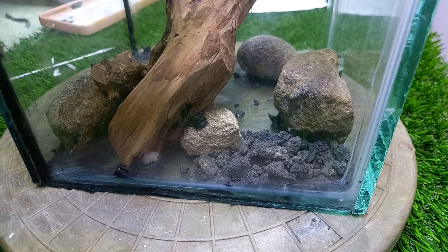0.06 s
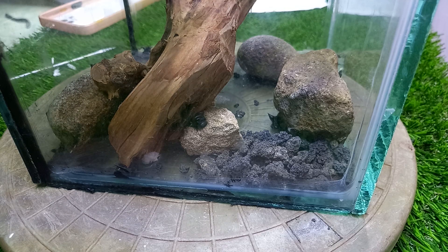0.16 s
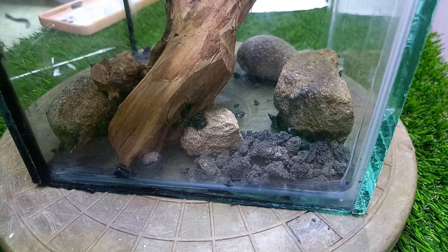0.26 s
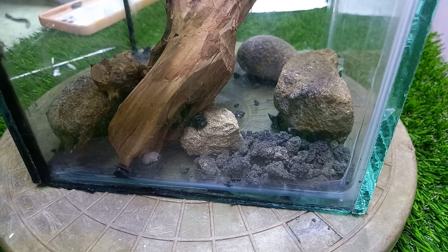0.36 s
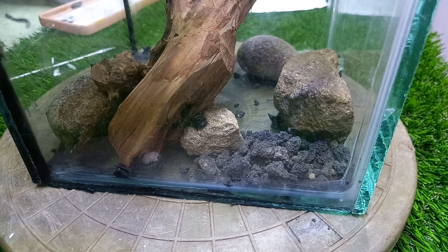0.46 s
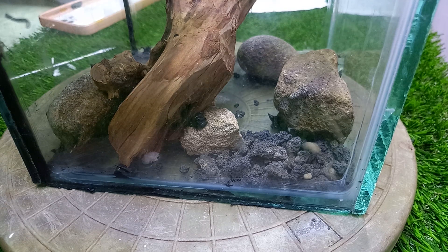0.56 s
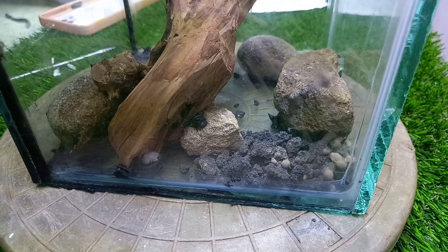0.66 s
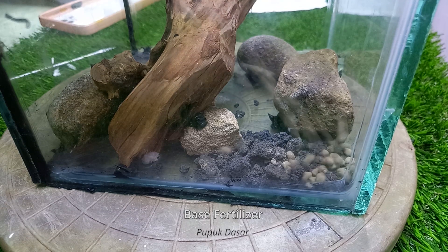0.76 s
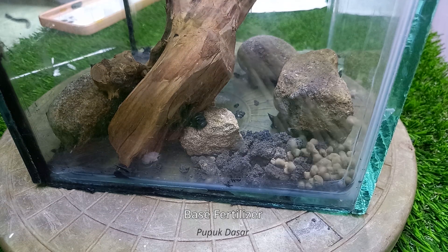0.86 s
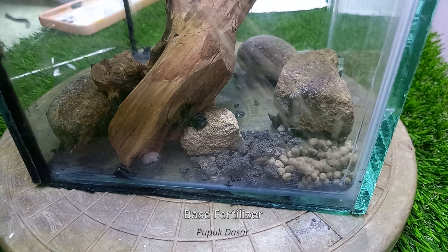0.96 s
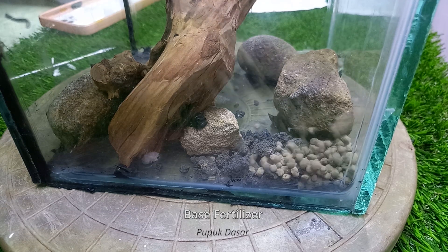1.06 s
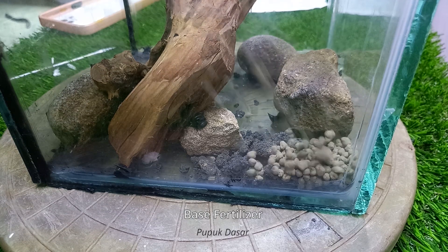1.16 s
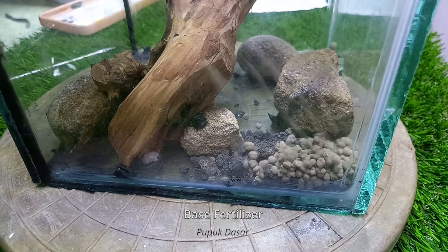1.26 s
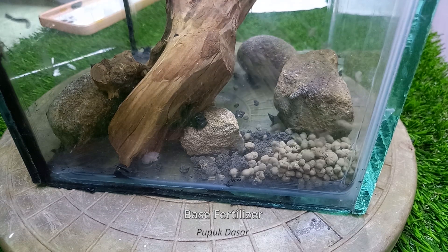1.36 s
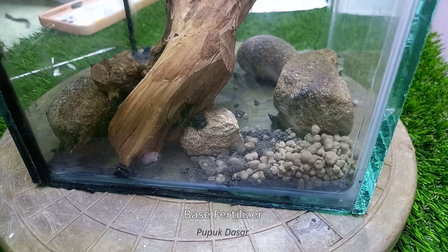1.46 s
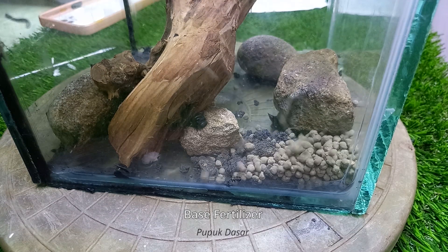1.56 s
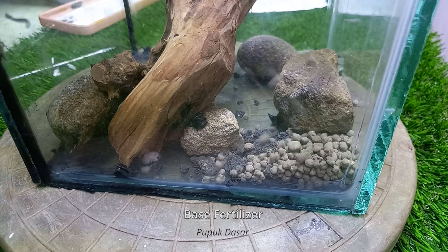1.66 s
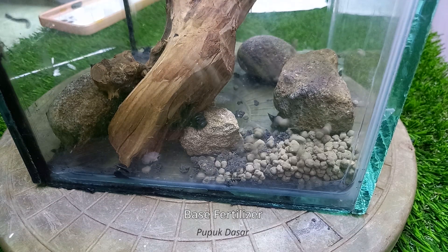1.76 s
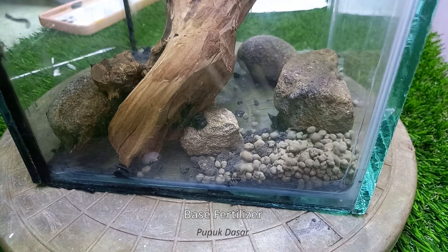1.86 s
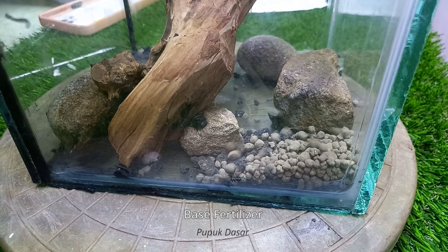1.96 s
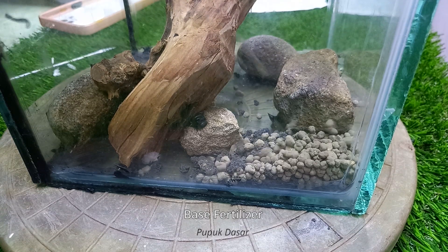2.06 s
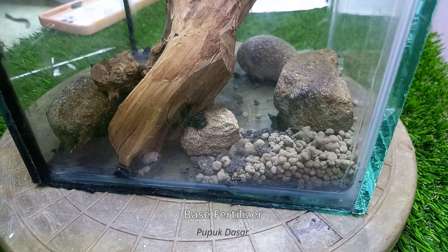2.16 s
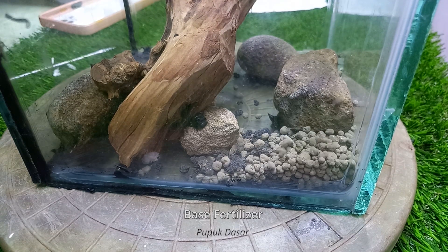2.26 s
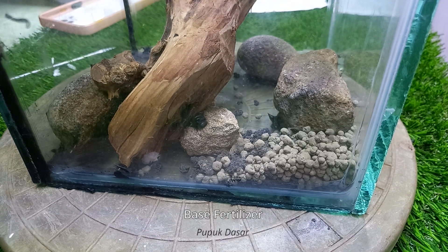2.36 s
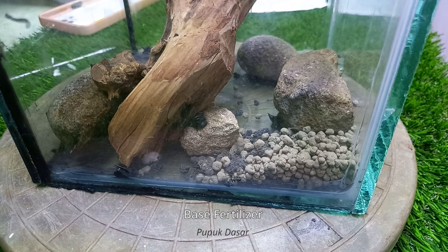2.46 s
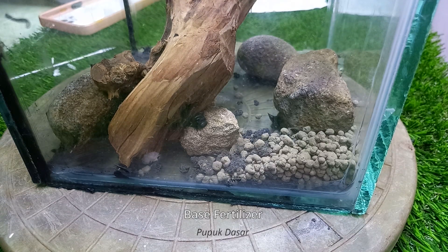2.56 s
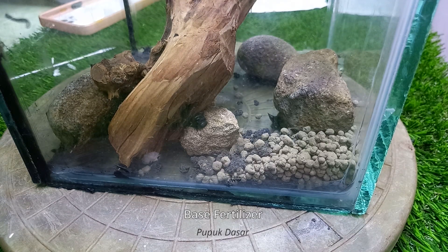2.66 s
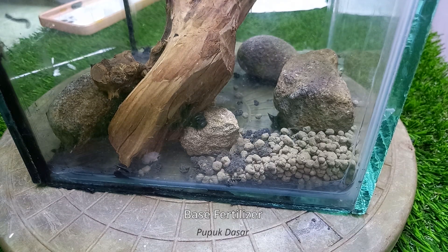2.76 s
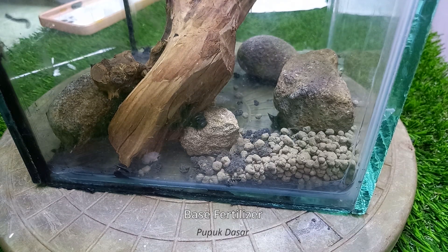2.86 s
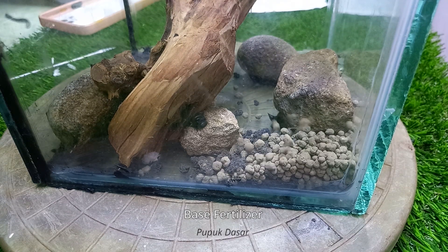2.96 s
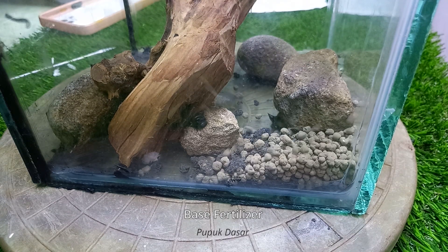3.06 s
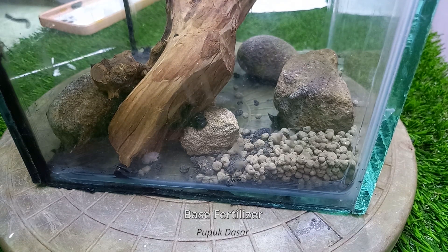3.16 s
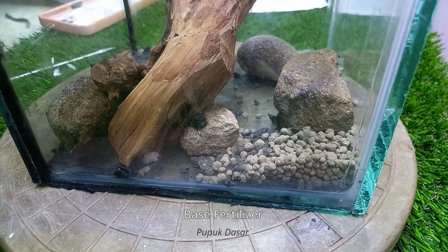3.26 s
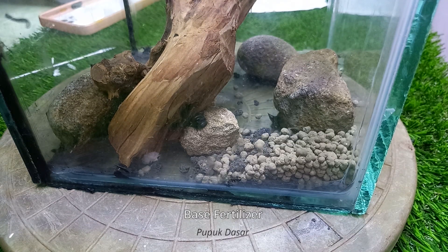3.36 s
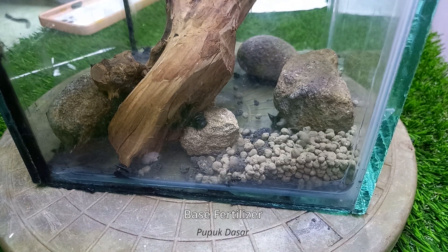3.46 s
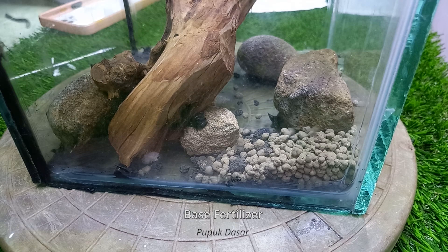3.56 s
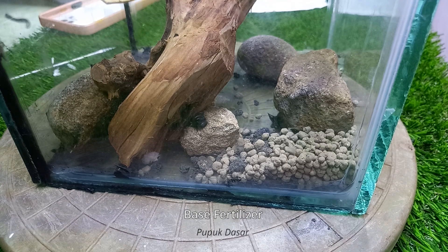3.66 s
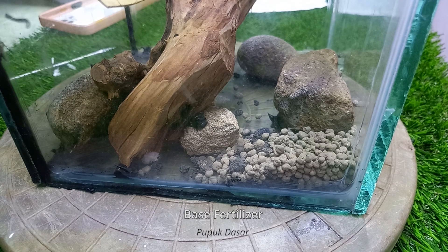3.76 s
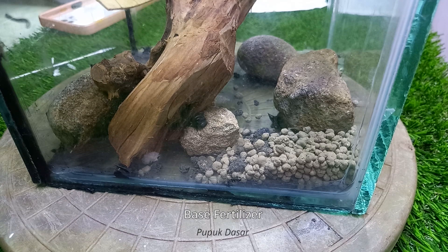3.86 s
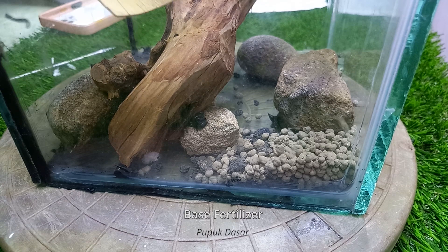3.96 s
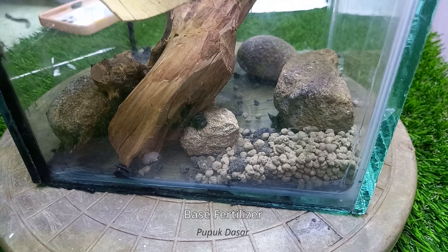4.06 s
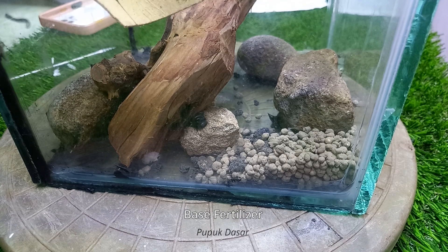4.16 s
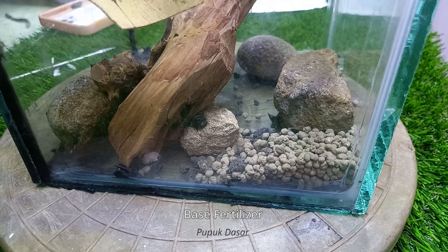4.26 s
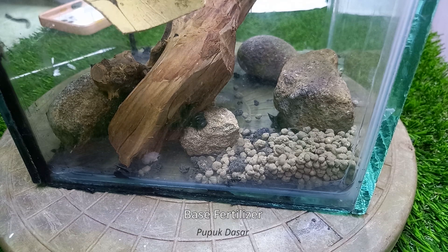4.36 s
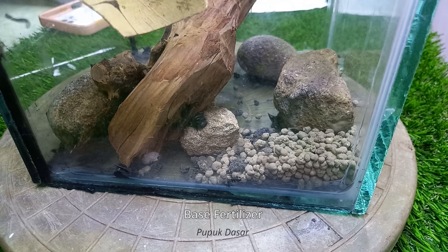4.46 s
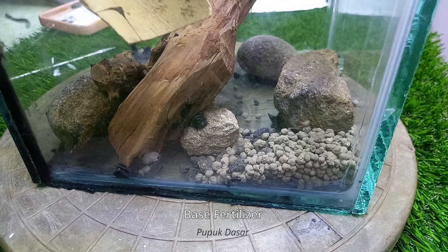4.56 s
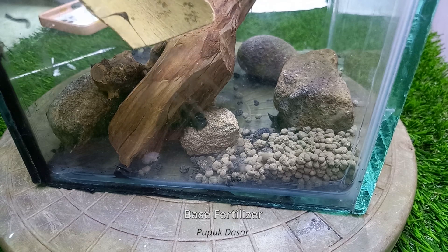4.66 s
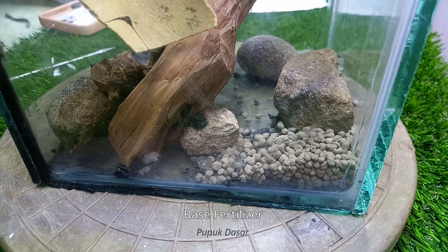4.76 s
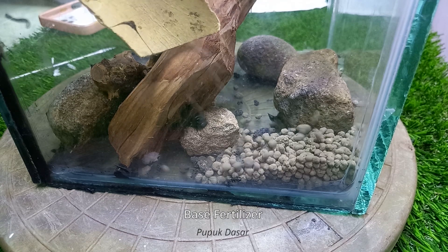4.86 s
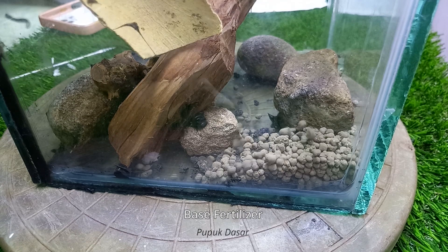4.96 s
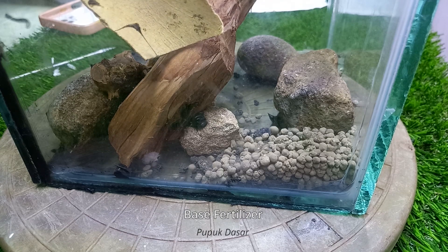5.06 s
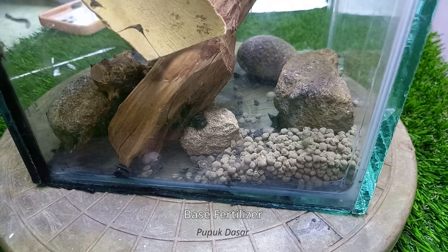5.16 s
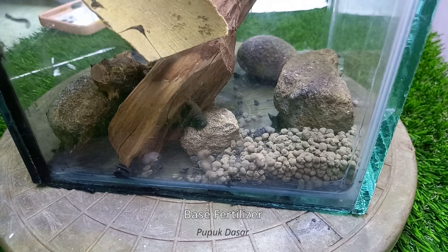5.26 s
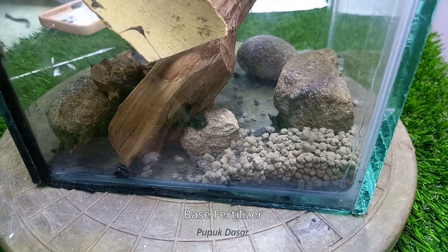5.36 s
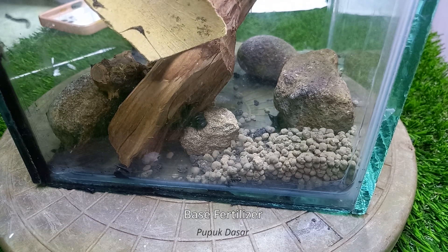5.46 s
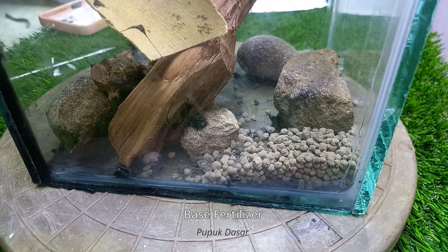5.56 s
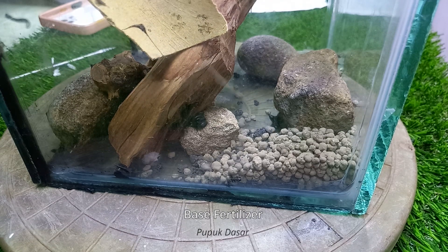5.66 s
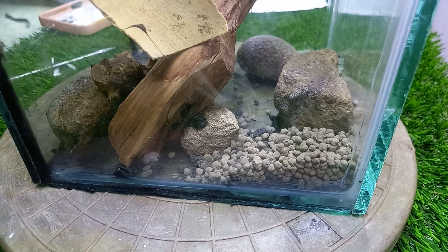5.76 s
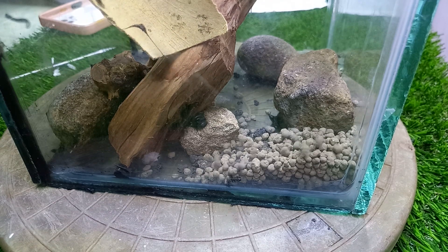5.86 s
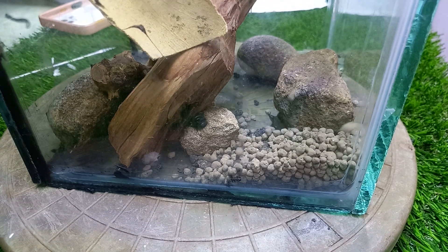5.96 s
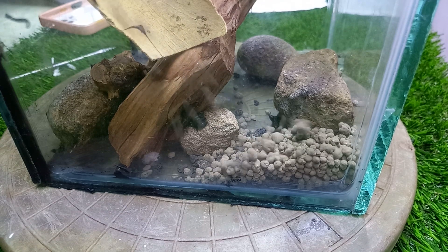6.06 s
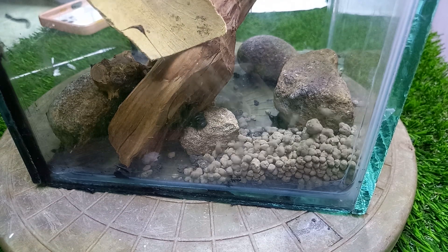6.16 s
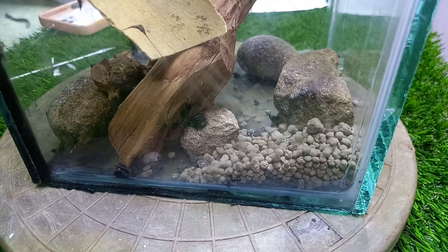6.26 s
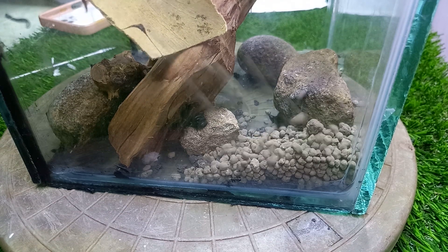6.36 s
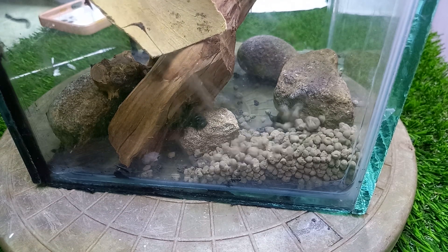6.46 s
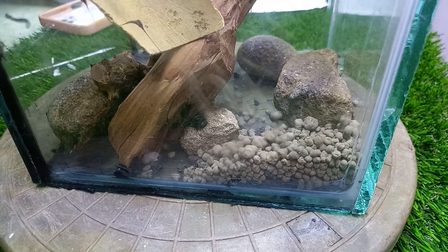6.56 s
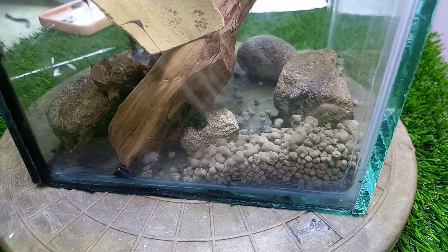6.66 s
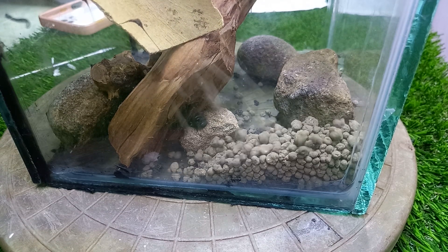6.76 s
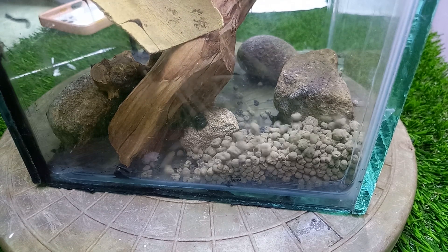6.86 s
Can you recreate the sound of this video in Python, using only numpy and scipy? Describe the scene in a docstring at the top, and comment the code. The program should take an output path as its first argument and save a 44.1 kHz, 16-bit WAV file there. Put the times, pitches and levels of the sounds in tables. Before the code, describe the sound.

Dry clay pellets are poured in three goes into an empty glass tank, clicking and rattling, while a distant engine drones and slows outside.

```python
"""In a small room, clay-like fertiliser pellets are poured into an empty glass aquarium in three goes, close by.
Each pellet is a short click with reflections; heap, bottom, panes and tank colour it or ring as dying sines.
Single hard hits, wall taps, low thuds and dull clatters stand out from the stream.
Outside, a distant engine, a sum of sines, drones and slowly loses speed.
Shaped noise gives the traffic, a deep rumble and still air."""
import sys
import numpy as np
from scipy import signal
from scipy.fft import rfft, irfft
from scipy.io import wavfile
from scipy.ndimage import uniform_filter1d

SR = 44100
rng = np.random.default_rng(int(sys.argv[2]) if len(sys.argv) > 2 else 0)


def generate_wav(sig):
    """Save sig (samples, or channels by samples) to the path in sys.argv[1] as 16-bit PCM at SR."""
    pcm = np.round(np.clip(np.atleast_2d(sig).T, -1, 1) * 32767).astype(np.int16)
    wavfile.write(sys.argv[1], SR, pcm)


N = 304290  # length in samples
TIME = np.arange(N) / SR  # seconds

# Levels in the tables are starting values: trims in the functions are added to them.
# traffic rumble, its colour: pitch_hz, level_db per Hz
TRAFFIC_COLOUR = [(20, -46), (40, -25), (70, -8), (100, 0), (140, 5.5), (180, -5.5), (270, -9),
                  (380, -16.5), (550, -32.5), (1200, -63)]
# traffic rumble, its loudness: time_s, level_db
TRAFFIC_LEVEL = [(0, -57.5), (.3, -50.5), (.55, -51.5), (1.05, -50), (1.25, -52.5), (2.1, -49.5),
                 (2.35, -57.5), (2.62, -44.5), (3.15, -45), (3.33, -51), (3.64, -46.5), (3.85, -50.5),
                 (4.6, -53.5), (4.9, -55), (5.3, -52.5), (6.2, -55.5), (6.9, -59)]
# deep rumble of the building: pitch_hz, level_db per Hz
DEEP_COLOUR = [(20, -48), (38, -27), (51, -8), (62, -9), (100, -21), (300, -70.5)]
# hiss of still air: pitch_hz, level_db per Hz
AIR_COLOUR = [(100, 2), (500, 2), (1000, -6), (3000, -10.5), (8000, -9.5), (16000, -22)]
# surges, several a second, of the sliding pellets and of the rumble: rate_hz, level_db
SURGES = [(1.5, -30), (4, 0), (12, 0), (40, -40), (100, -90)]
# average speed of the engine: time_s, turns_per_s
ENGINE_SPEED = [(0, 30.3), (1, 30.5), (1.7, 30.2), (2.2, 29.5), (2.5, 30.2), (3, 29.9), (3.4, 29),
                (3.75, 28.1), (4.05, 27.5), (4.4, 26.5), (4.8, 25.8), (5.3, 25.3), (5.85, 24), (6.3, 22.6),
                (6.9, 22.2)]
# loudness of the engine's drone: time_s, level_db
DRONE_LEVEL = [(0, -57), (.15, -58), (.3, -41), (.53, -48.5), (.77, -36), (1.2, -42.5), (1.72, -40),
               (2.35, -46), (2.77, -32), (3.15, -39), (3.6, -35.5), (4.4, -37.5), (4.95, -52.5),
               (5.27, -43), (5.6, -46), (6.28, -47), (6.4, -63.5), (6.9, -63)]
# loudness of the engine's third order: time_s, level_db
THIRD_ORDER_LEVEL = [(0, -68), (.35, -48.5), (1.9, -48.5), (2.25, -39.5), (2.7, -41), (3.15, -48),
                     (3.42, -44), (3.8, -60), (4.05, -45), (4.3, -65), (4.55, -53.5), (6.3, -53),
                     (6.5, -76), (6.9, -78)]
# loudness of the engine's second order: time_s, level_db
SECOND_ORDER_LEVEL = [(0, -70), (2.8, -68), (3.1, -55), (3.55, -63), (3.9, -59), (4.6, -52), (5, -66),
                      (5.4, -58), (6, -70)]
# brief dips of the drone and the third order: centre_s, change_db
DRONE_DIPS = [(1.0, -0.5), (1.21, -6), (1.46, -3), (1.87, -6), (2.33, -3.5), (3.29, -23), (3.5, -6),
              (3.75, -8.5), (3.95, -7.5), (4.21, -12), (4.93, -6), (6.05, -16)]
# how the room favours some of the engine's orders: pitch_hz, level_db
ROOM_BOOM = [(88, -41), (102, 1), (120, 1.5), (130, -16), (148, -32.5), (180, -39), (215, -24.5),
             (310, -28), (420, -22.5)]
# dull clatters further off in the room: start_s, level_db, die_away_s (time to fall 60 dB)
CLATTER_EVENTS = [(0.096, -56.5, 0.36), (3.396, -44, 0.21), (3.609, -47.5, 0.18), (3.879, -69, 0.44)]
# colour of those clatters: pitch_hz, level_db per Hz
CLATTER_COLOUR = [(180, -32), (330, 7), (500, -9.5), (800, -3), (1400, -11), (2200, -12), (4000, -40)]
# lumps that thud on the bottom: start_s, strength_db, pitch_hz, knock_db (added to the strength)
THUD_EVENTS = [(0.663, -36, 408, 8), (0.935, -31, 370, -1), (1.043, -31, 375, -2), (1.257, -32, 353, -9),
               (1.659, -30, 314, -5), (3.293, -37, 344, -6), (4.886, -35, 345, -18),
               (4.962, -34.5, 349, -7), (5.272, -37, 338, 2), (5.704, -21, 364, -13),
               (5.903, -28.5, 368, 9), (6.364, -30, 352, -5), (6.528, -24.5, 362, -2),
               (6.568, -36, 358, -8), (6.617, -25, 370, -9), (6.882, -32, 377, -2)]
# pellets that glance off a side wall and let it ring: start_s, strength_db
TAP_EVENTS = [(2.145, -20), (2.174, -26), (2.246, -27.5), (2.352, -42), (3.951, -30), (3.9932, -26),
              (4.0238, -37), (5.3537, -17)]
# single pellets that land hard: start_s, level_db (first 5 ms), pitch_hz, hardness_db (treble against the rest)
HARD_PELLETS = [(0.0953, -42, 4570, -6), (0.2007, -32, 2170, -3), (0.2153, -39, 3980, -4),
                (0.2415, -41, 2280, -15), (0.2513, -37, 3980, -5), (0.2765, -33, 6440, -1),
                (0.2884, -30.5, 4340, -8), (0.3057, -34, 4500, -1), (0.3258, -29.5, 2200, -13),
                (0.364, -29.5, 4530, -7), (0.4103, -36, 2590, -14), (0.492, -30.5, 3500, -18),
                (0.585, -31, 3500, -17), (0.662, -28, 1970, -6), (0.724, -31.5, 4500, 5),
                (0.756, -35, 7200, 6), (0.786, -32, 7100, 11), (0.811, -42, 3600, -13),
                (0.928, -30, 7200, 4), (1.05, -29.5, 2710, -10), (1.076, -31, 3800, 0),
                (1.175, -35.5, 7200, 5), (1.246, -32, 4940, -6), (1.379, -31.5, 1400, -12),
                (1.4761, -27.5, 2800, -11), (1.6073, -33, 4340, -22), (1.6585, -30.5, 5150, -3),
                (1.761, -30.5, 3550, -5), (1.7917, -33.5, 5860, 2), (1.8176, -34, 2600, -8),
                (1.843, -32.5, 4530, 2), (1.9008, -34, 4530, -18), (1.947, -35, 3660, -17),
                (1.9572, -34, 3820, -11), (1.9766, -39, 2590, -5), (1.9906, -37, 4530, 5),
                (2.0042, -33.5, 4000, -14), (2.021, -39, 3660, 2), (2.049, -32.5, 7580, 18),
                (2.0854, -33.5, 2780, -4), (2.1251, -34.5, 2620, -3), (2.178, -39, 6120, 7),
                (2.2388, -44, 8260, 7), (2.2479, -41, 4530, -2), (2.2605, -42.5, 2840, -2),
                (2.5302, -49.5, 4970, -7), (2.5764, -39, 5300, -15), (2.5933, -47, 4940, -9),
                (2.6246, -43.0, 6390, -1), (2.639, -45, 5380, -3), (2.6484, -39, 5380, 1),
                (2.6703, -42, 4530, 2), (2.693, -45, 2850, -4), (2.7121, -41.5, 4530, 0),
                (2.725, -43, 7260, 2), (2.741, -42, 4340, -6), (2.76, -42, 4340, -10),
                (2.771, -38, 2190, -15), (2.7937, -39.5, 6390, 8), (2.8098, -44, 4500, -2),
                (2.8263, -38.5, 3210, -11), (2.8809, -36.5, 6960, 10), (2.9308, -33.5, 7260, 4),
                (2.948, -34, 4300, -3), (2.957, -39, 1950, 3), (2.965, -41, 1900, -4), (2.98, -48, 3600, 3),
                (3.007, -35.5, 4340, -3), (3.0324, -36, 2830, -9), (3.044, -36.5, 2490, -3),
                (3.0772, -35.5, 2590, 2), (3.0964, -38.5, 1920, -7), (3.104, -39, 2950, -9),
                (3.1554, -36.5, 2370, -34), (3.1855, -39.5, 5610, 1), (3.232, -39.5, 2270, -17),
                (3.24, -45, 4160, 3), (3.2621, -34.5, 7580, 5), (3.2897, -42.0, 2710, -26),
                (3.3077, -41, 2710, -16), (3.3158, -38.5, 4730, 7), (3.3551, -33, 5430, -1),
                (3.3787, -37.5, 4730, -1), (3.395, -38, 2450, -19), (3.4293, -41.5, 6670, 0),
                (3.48, -43.5, 7910, 2), (3.4995, -51.5, 2300, -15), (3.5556, -52.5, 4940, -3),
                (3.599, -42.5, 7260, 5), (3.6485, -51.5, 5110, -9), (3.664, -50.5, 1840, -19),
                (3.701, -45, 5860, -8), (3.7154, -39.5, 6160, -6), (3.754, -42.5, 3660, -15),
                (3.7627, -42, 4530, -1), (3.78, -43.5, 3630, -7), (3.82, -42, 5610, -10),
                (3.854, -36, 2870, -14), (3.8645, -38, 2510, -20), (3.8865, -44, 2380, -28),
                (3.9342, -48, 7580, 5), (3.941, -46, 7260, -2), (3.952, -48, 5150, -10),
                (3.9674, -49, 3980, -17), (4.026, -45.5, 4530, 5), (4.044, -47, 4580, -16),
                (4.0784, -52, 5100, 5), (4.096, -48, 4940, -8), (4.1192, -40, 4560, -3),
                (4.147, -51, 3210, -11), (4.1646, -48.5, 1720, -8), (4.2192, -47.5, 4160, -10),
                (4.2412, -47, 1840, -5), (4.2846, -40.5, 1750, -10), (4.301, -37.5, 1880, -2),
                (4.3267, -47, 1900, 0), (4.351, -43.5, 1950, 3), (4.377, -41, 4530, 5),
                (4.4838, -42, 4340, -5), (4.5445, -43, 3400, -13), (4.555, -44, 3900, -6),
                (4.5724, -34.5, 4500, 2), (4.678, -36, 4300, 8), (4.7837, -36, 2710, -8),
                (4.802, -30, 1580, -23), (4.8532, -32.5, 5380, 0), (4.8704, -36, 5190, -12),
                (4.9354, -34, 7260, 7), (5.0264, -41, 1200, -23), (5.062, -36.5, 1680, -9),
                (5.0801, -37, 4940, 0), (5.1117, -43, 1620, -10), (5.1321, -34, 1340, -15),
                (5.148, -39, 1390, -3), (5.219, -39.5, 1610, -13), (5.272, -39, 1490, -19),
                (5.2816, -40, 3800, -6), (5.311, -34.0, 5500, -7), (5.4004, -41.5, 4940, -3),
                (5.42, -46, 4950, -15), (5.429, -40.5, 7580, -9), (5.4367, -41, 1740, -16),
                (5.482, -41.5, 7580, 3), (5.493, -38, 5380, -4), (5.524, -42, 7240, 1),
                (5.535, -45, 1760, -3), (5.5598, -40, 4940, -16), (5.6234, -34.5, 1690, -4),
                (5.6442, -35.5, 2710, -29), (5.6663, -40, 4530, -19), (5.7139, -33.5, 1250, -29),
                (5.7507, -34.5, 2950, -4), (5.8698, -36, 1818, -13), (5.9385, -31.5, 1350, -4),
                (6.111, -30.5, 1590, -8), (6.2926, -30.5, 9000, 10), (6.422, -29, 1820, -11),
                (6.5254, -27.5, 1150, -6), (6.554, -30.5, 6030, 11), (6.701, -33.5, 1620, 4),
                (6.809, -33.5, 4530, -2), (6.8189, -37, 1190, -16)]
# colour of clicks: pitch_hz, level_db per Hz
CLICK_COLOUR = [(350, -28), (600, -22.5), (790, -18), (957, -10), (1160, -10), (1550, -14), (2150, -3.5),
                (3430, -7.5), (4520, -6.5), (6750, -10), (7310, -8.5), (9760, -10.5), (11700, -10.5),
                (14400, -15.5), (15100, -11), (15750, -14)]
# colour of knocks: pitch_hz, level_db per Hz
KNOCK_COLOUR = [(300, -38), (600, -3.5), (850, -5.5), (1200, -7), (1800, -1.5), (2400, -11), (3500, -2.5),
                (6000, -34)]
# modes (own ringing tones) of the glass walls: pitch_hz, width_hz, level_db
WALL_MODES = [(1406, 16, -5), (2770, 160, 5), (3760, 60, -2.5), (4640, 90, 2), (5350, 70, 2),
              (5870, 110, 3), (8150, 240, 4), (9010, 70, 3.5), (10230, 70, 3.5), (4400, 100, 3.5),
              (7112, 60, 9.5), (7375, 55, 5.5), (11420, 150, 5), (12100, 110, -1), (13660, 150, 0)]
# modes of the bottom pane: pitch_hz, width_hz, level_db
BOTTOM_MODES = [(766, 26, 8), (1161, 49, 12.5), (1415, 46, 10.5), (1690, 50, 8.5), (1816, 100, 7.5),
                (2150, 80, 0)]
# low modes of the whole tank: pitch_hz, width_hz, level_db
TANK_MODES = [(316, 26, 1.5), (367, 32, 4.5), (560, 240, -14.5), (792, 45, -8.5)]
# lean to one side by pitch: pitch_hz, left_minus_right_db
SIDE_LEAN = [(60, -12), (110, -16), (200, -21), (380, 18), (700, -4.5), (1290, -5), (2380, 3), (4400, 2),
             (8120, 6.5), (15000, 5.5)]
# strength of the stream, one list for each of the three goes: time_s, level_db
GOES = [
    [(.17, -57.5), (.27, -45), (.4, -33.5), (.72, -31.5), (1.17, -35), (1.5, -35.5), (1.98, -41.5),
     (2.15, -44.5), (2.22, -60.5), (2.36, -65)],
    [(2.58, -61), (2.74, -51), (2.85, -47.5), (2.97, -45), (3.12, -50), (3.36, -53), (3.52, -71),
     (3.65, -63), (3.85, -60), (4.03, -62.5), (4.22, -67)],
    [(4.31, -48), (4.45, -46.5), (4.72, -40), (4.95, -45), (5.17, -55), (5.3, -50), (5.54, -51),
     (5.68, -42.5), (6.1, -38.5), (6.47, -35.5), (6.9, -41)],
]
# where each go lands, against its clicks: bottom_knock_db, tank_boom_db, treble_db, spread_s (from heap to glass)
GO_LANDINGS = [(-10.5, -9.5, -3.5, 0.2), (-3.5, 2, 0, 0.35), (-2.5, -6.5, -0.5, 0.083)]
# reverberation of the room: pitch_hz, die_away_s (time to fall 60 dB)
ROOM_DECAY = [(300, 0.32), (1500, 0.33), (5000, 0.13), (14000, 0.14)]

# a stronger stream is thicker (dB of rate per dB) and cushions itself (dB of treble per dB)
USUAL_DB, USUAL_PER_S, STRAY_PER_S, THICKENING, CUSHIONING = -39, 700, 110, 1.35, -0.06
# the first pellets of a go fall softly on the heap
HEAP_KNOCK_DB, HEAP_BOOM_DB, HEAP_TREBLE_DB = -15, -47.5, -11.5


def gain_of(db):
    """Turns decibels into amplitude."""
    return 10 ** (np.asarray(db) / 20)


def evened(x):
    """Scales a sound to rms 1."""
    return x / np.sqrt(np.mean(x ** 2) + 1e-20)


def read(points, hz):
    """Reads a table between its points, on a log-frequency axis."""
    f, value = np.transpose(points)
    return np.interp(np.log(hz + 1), np.log(f + 1), value)


def curve(rows):
    """Draws straight lines between the points of a time table, one value per sample."""
    s, value = np.transpose(rows)
    return np.interp(TIME, s, value)


def add(mix, s, sound):
    """Mixes a stereo sound in at time s."""
    part = mix[:, max(round(s * SR), 0):][:, :sound.shape[1]]
    part += sound[:, :part.shape[1]]


def through(x, response):
    """Lets each channel excite a response (convolution), keeping the length."""
    x = np.atleast_2d(x)
    stereo = np.broadcast_to(x, (2, x.shape[1]))
    return signal.oaconvolve(stereo, response, axes=1)[:, :x.shape[1]]


def noise(points):
    """Noise of a given spectrum, rms 1."""
    spectrum = rfft(rng.standard_normal(N))
    shape = gain_of(read(points, np.fft.rfftfreq(N, 1 / SR)))
    return evened(irfft(spectrum * shape, N))


def treble_of(x, corner_hz=6400):
    """The part of a sound above a corner pitch."""
    high_pass = signal.butter(3, corner_hz, "high", fs=SR, output="sos")
    return signal.sosfiltfilt(high_pass, x, padtype="constant")


def brightened(x, treble_db):
    """Harder contact is shorter and so has more treble."""
    return x + (gain_of(treble_db) - 1) * treble_of(x)


def punch(click, size):
    """Scales a click so that the middle of its two channels has rms 1 over its first samples."""
    return click / np.sqrt(np.mean(click.mean(0)[:size] ** 2) + 1e-20)


def colour(points, size=4096):
    """A stereo response with a given spectrum that starts at once and leans to one side by pitch."""
    hz = abs(np.fft.fftfreq(size, 1 / SR))
    lean_db = np.array([[.5], [-.5]]) * read(SIDE_LEAN, hz)
    log_gain = np.log(gain_of(read(points, hz) + lean_db))
    minimum_phase = np.exp(np.conj(signal.hilbert(log_gain)))
    return np.fft.ifft(minimum_phase).real


def ringing(modes, size=2048):
    """One dying sine for each mode, wider ones dying sooner; each channel has its own phase."""
    t, sines = np.arange(size) / SR, []
    for hz, width, db in modes:
        decay = 2 * np.pi * width / SR * np.exp(-np.pi * width * t)
        phase = rng.uniform(-1.04, 1, (2, 1))
        sines.append(gain_of(db) * decay * np.cos(2 * np.pi * hz * t + phase))
    return np.array(sines)


def impact(hz, sharpness, scatter_db=-1, scatter_s=0.0036, direct_left=0.18, shared=0.4, size=1024):
    """One pellet: a snap of a few cycles, then its reflections between the glass walls."""
    f, t = np.fft.rfftfreq(size, 1 / SR) + 1, np.arange(size) / SR
    lag_s = max(rng.normal(0.0002, .00005), 0)  # the right microphone is nearer
    walls = rng.standard_normal((3, size)) * np.exp(-t / scatter_s)
    walls = rfft(walls * gain_of(scatter_db) / np.linalg.norm(walls[0]))
    # part of the reflections is alike in both ears
    walls = np.sqrt(shared) * walls[2] + np.sqrt(1 - shared) * walls[:2]
    left = (direct_left + 0.88 * walls[0]) * np.exp(-2j * np.pi * f * lag_s)
    right = 1 + 1.1 * walls[1]
    resonance = 1 + 1j * sharpness * (f / hz - hz / f)
    return irfft(np.array([left, right]) / resonance)


def struck(click, body, modes):
    """A click in the tank: where it lands, drawn at random, decides how much each mode rings."""
    strengths = np.sqrt(3) * rng.uniform(-0.77, 1, len(modes))
    ring = np.tensordot(strengths, modes, 1) * np.array([[1.25], [.75]])
    return signal.fftconvolve(click, body + ring, axes=1)


def background(deep_db=-60.5, deep_follows=0.42, air_db=-69, width=0.24):
    """Traffic and a deep rumble that swells with the engine, nearly alike in both ears, and hissing air."""
    drone_db = curve(DRONE_LEVEL)
    swell_db = drone_db - drone_db.mean()
    middle = noise(TRAFFIC_COLOUR) * np.array([[1.1], [.9]])
    sides = width * noise(TRAFFIC_COLOUR) * np.array([[1], [-1]])
    traffic = (middle + sides) * gain_of(2.2 * noise(SURGES))
    deep = gain_of(deep_db + deep_follows * swell_db) * noise(DEEP_COLOUR)
    air = gain_of(air_db) * np.array([noise(AIR_COLOUR), noise(AIR_COLOUR)])
    return gain_of(curve(TRAFFIC_LEVEL)) * traffic + deep + air


def engine(drone_db=-1.0, third_db=-2, dip_s=0.049, flutter=0.2, unsteady=0.011):
    """Low orders (multiples) of an uneven engine speed; the room's boom favours some of them."""
    speed = curve(ENGINE_SPEED)
    dips_db = sum(db * np.exp(-((TIME - s) / dip_s) ** 2) for s, db in DRONE_DIPS)
    waver = [(1, -12), (5, 0), (11, -1), (25, -22), (80, -90)]  # rate in Hz, dB
    angle = 2 * np.pi * np.cumsum(speed * (1 + unsteady * noise(waver))) / SR
    orders = np.zeros(N)
    for k in range(4, 13):
        orders += gain_of(read(ROOM_BOOM, k * speed)) * np.sin(k * angle + rng.uniform(0, 2 * np.pi))
    drone = gain_of(curve(DRONE_LEVEL) + dips_db + drone_db) * orders * (1 + flutter * noise(waver))
    third = gain_of(curve(THIRD_ORDER_LEVEL) + dips_db + third_db) * np.sin(3 * angle)
    third *= 1 + 2 * flutter * noise(waver)
    second = gain_of(curve(SECOND_ORDER_LEVEL)) * np.sin(2 * angle)
    return np.sqrt(2) * (drone + third + second) * np.array([[1.08], [.92]])


def clatters(knocks_per_s=900, size=16384):
    """Dull clatters: a quick run of low knocks that dies away."""
    out, t, body = np.zeros((2, N)), np.arange(size) / SR, colour(CLATTER_COLOUR)
    for s, db, t60 in CLATTER_EVENTS:
        knocks = rng.standard_normal((2, size)) * (rng.random(size) < knocks_per_s / SR)
        run = evened(through(knocks + knocks[::-1] / 2, body))  # each ear also hears half of the other
        add(out, s, run * gain_of(db - 60 * t / t60))
    return out


def thuds(ring_db=-1, t60=0.072, rise_s=0.0016, size=8192):
    """Lumps knock on the bottom pane and bend it, so that it rings low and briefly."""
    out, t, body = np.zeros((2, N)), np.arange(size) / SR, colour(KNOCK_COLOUR, size=2048)
    for s, db, hz, knock_db in THUD_EVENTS:
        envelope = (1 - np.exp(-t / rise_s)) * gain_of(db + ring_db - 60 * t / t60)
        ring = np.sin(2 * np.pi * hz * t) * envelope
        add(out, s, ring * np.array([[1.4], [.6]]))
        knock = struck(impact(860, sharpness=0.43), body, ringing(BOTTOM_MODES))
        add(out, s, gain_of(db + knock_db) * knock / abs(knock).max())
    return out


def wall_taps(tick_db=-12):
    """A glancing pellet ticks lightly and leaves the side wall ringing."""
    out, body = np.zeros((2, N)), colour(CLICK_COLOUR, size=4096)
    # the least damped modes lead
    lasting = [(hz, width, db - 20 * np.log10(width / WALL_MODES[0][1])) for hz, width, db in WALL_MODES]
    for s, db in TAP_EVENTS:
        ring = ringing(lasting, size=4096).sum(0)
        tap = ring / abs(ring.mean(0)).max()
        tick = through(body, impact(6000, sharpness=1))
        add(out, s, gain_of(db) * (tap + gain_of(tick_db) * tick / abs(tick).max()))
    return out


def hard_hits(wall_ring_db=-10, bottom_ring_db=-9, bounce_db=-21, hop_s=0.012, soft_db=-13, thin_db=-10, size=220):
    """Single pellets strike squarely and bounce once; bright ones ring the walls, low ones the bottom."""
    out, body = np.zeros((2, N)), colour(CLICK_COLOUR, size=2048)
    walls = gain_of(wall_ring_db) * ringing(WALL_MODES)
    bottom = gain_of(bottom_ring_db) * ringing(BOTTOM_MODES)
    shapes = np.exp(rng.uniform(-.6, .6, (len(HARD_PELLETS), 3)))  # each pellet has its own shape
    for (s, db, hz, hard_db), (hop, narrow, scatter) in zip(HARD_PELLETS, shapes):
        snap = impact(hz, sharpness=narrow, scatter_db=.5, scatter_s=.0019 * scatter)
        click = struck(snap, body, bottom if hz < 2000 else walls)
        treble = treble_of(click)
        click = punch(click - treble, size) + gain_of(hard_db) * punch(treble, size)
        click = gain_of(db) * punch(click, size)
        add(out, s, click)
        add(out, s + hop * hop_s, gain_of(bounce_db) * click)
    on_heap = sum(np.exp(-((TIME - go[0][0]) / landing[3]) ** 2) for go, landing in zip(GOES, GO_LANDINGS))
    # around the start of a go, the heap weakens the top and the low part
    top = treble_of(out, corner_hz=10100)
    low = out - treble_of(out, corner_hz=1610)
    return out + (gain_of(soft_db * on_heap) - 1) * top + (gain_of(thin_db * on_heap) - 1) * low


def shower(per_s, spread_db):
    """Random impacts: many small, a few large."""
    falls = rng.random(N) < per_s / SR
    return falls * gain_of(spread_db * np.minimum(rng.exponential(1, N), 4))


def steadied(x, size=2600):
    """Holds the power of a stream near 1 over about a tenth of a second, leaving its grain."""
    power = uniform_filter1d(uniform_filter1d(x.mean(0) ** 2, size), size)
    return x / np.sqrt(abs(power) + 0.0083 * power.mean())


def stream(per_s, low_hz, high_hz, tone, modes, ring_db, on_glass, sharpness, spread_db, count):
    """Pellets of many sizes, each with its own click; only a share of the kinds touches glass."""
    kind, blows = rng.integers(0, count, N), shower(per_s, spread_db)
    body, panes, out = colour(tone, size=2048), gain_of(ring_db) * ringing(modes), np.zeros((2, N))
    rings = rng.random(count) < on_glass
    clicks = []
    for hz, touches in zip(np.geomspace(low_hz, high_hz, count), rings):
        clicks.append(struck(impact(hz, sharpness), body, touches * panes))
    for i in np.flatnonzero(blows):
        add(out, i / SR, blows[i] * clicks[kind[i]])
    return steadied(out)


def pellets(click_db=1, knock_db=-1, boom_db=-2.5, surge_db=0.47, boom_surge_db=2.0, weight=0.16, stop_s=0.042):
    """The stream clicks on the heap, knocks on the bottom and shakes the tank, more so the heavier it is."""
    flow, click, treble, knock, boom = np.zeros((5, N))
    for points, (bottom_db, tank_db, treble_db, spread_s) in zip(GOES, GO_LANDINGS):
        level_db = curve(points)
        start, end, heavy_db = points[0][0], points[-1][0], level_db - USUAL_DB
        # each go fades in and out over stop_s
        pouring = np.clip(1 + np.minimum(TIME - start, end - TIME) / stop_s, 0, 1)
        on_heap = np.exp(-np.maximum(TIME - start, 0) / spread_s)
        flow += pouring * USUAL_PER_S * gain_of(THICKENING * heavy_db)
        click += pouring * gain_of(level_db)
        treble += pouring * (treble_db + HEAP_TREBLE_DB * on_heap + CUSHIONING * heavy_db)
        knock += pouring * gain_of(level_db + bottom_db + HEAP_KNOCK_DB * on_heap)
        boom += pouring * gain_of(level_db + tank_db + HEAP_BOOM_DB * on_heap + weight * heavy_db)
    flow += STRAY_PER_S
    clicks = stream(flow, 1800, 10300, CLICK_COLOUR, WALL_MODES, ring_db=-5.0, on_glass=.45,
                    sharpness=0.91, spread_db=4.0, count=200)
    knocks = stream(1.1 * flow, 830, 3300, KNOCK_COLOUR, BOTTOM_MODES, ring_db=0.5, on_glass=.75,
                    sharpness=0.71, spread_db=5.5, count=80)
    booms = through(shower(0.41 * flow, spread_db=2.0), ringing(TANK_MODES, size=4096).sum(0))
    booms = steadied(booms * np.array([[1.35], [.65]]))
    surges = noise(SURGES)
    rattle = gain_of(click_db) * click * brightened(clicks, treble) + gain_of(knock_db) * knock * knocks
    return gain_of(surge_db * surges) * rattle + gain_of(boom_db + boom_surge_db * surges) * boom * booms


def room(x, first_s=0.0043, size=22050):
    """A diffuse tail of reflections, made of noise whose treble dies first."""
    hz, t, z = signal.stft(rng.standard_normal((2, size)), SR, nperseg=256)
    tail = signal.istft(z * gain_of(-60 * t / read(ROOM_DECAY, hz)[:, None]), SR)[1]
    tail *= np.arange(tail.shape[1]) / SR > first_s  # nothing comes back before this
    return through(x, tail / np.linalg.norm(tail[0]))


def scene(room_db=-10):
    """The tank in its room, over the clatters and the background."""
    tank = thuds() + wall_taps() + hard_hits() + pellets()
    return background() + engine() + clatters() + tank + gain_of(room_db) * room(tank)


def record(dry, edge_hz=15900):
    """The recorder's band limit: a steep low-pass."""
    low_pass = signal.firwin(401, edge_hz, window=("kaiser", 8), fs=SR)
    return signal.oaconvolve(dry, low_pass[None], "same")


dry = scene()
out = record(dry)
generate_wav(out)
```